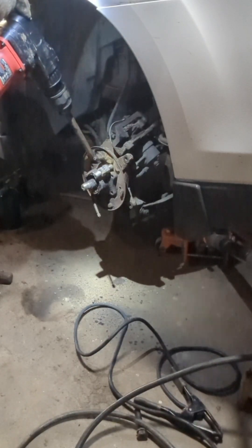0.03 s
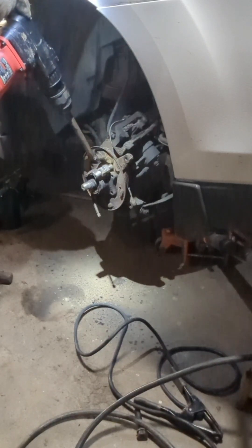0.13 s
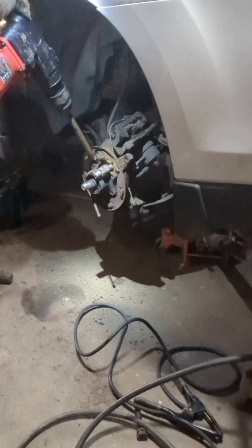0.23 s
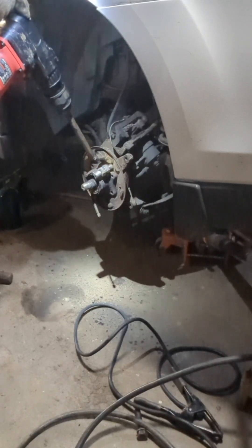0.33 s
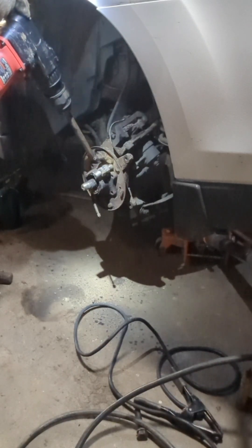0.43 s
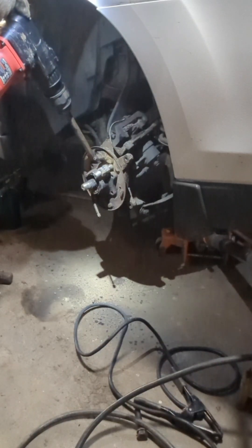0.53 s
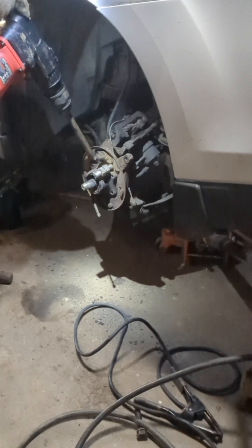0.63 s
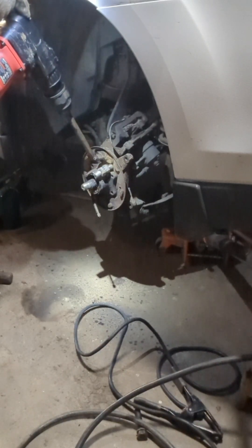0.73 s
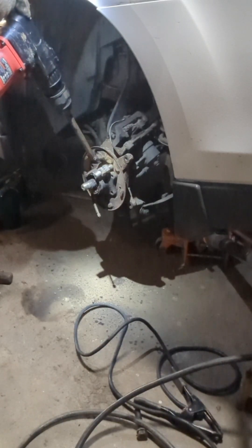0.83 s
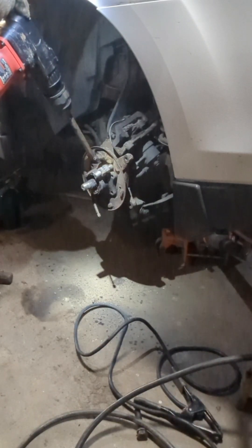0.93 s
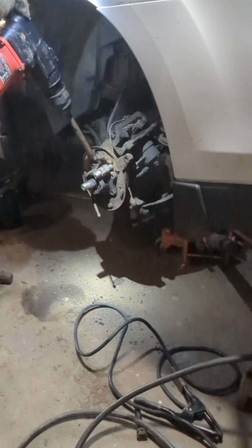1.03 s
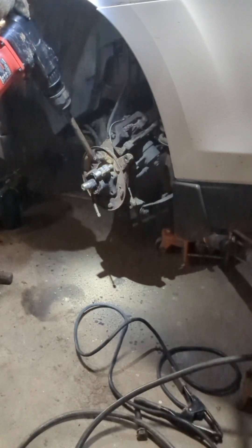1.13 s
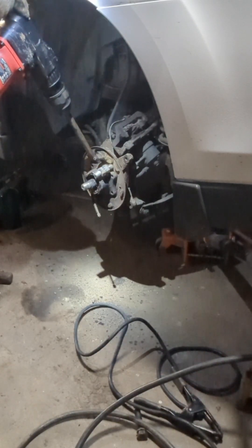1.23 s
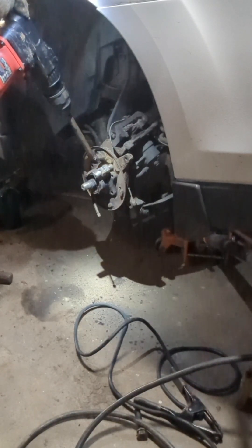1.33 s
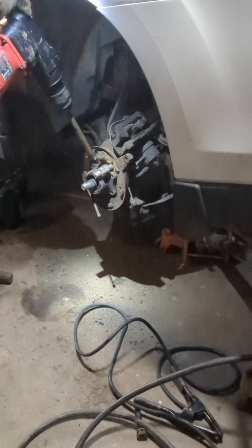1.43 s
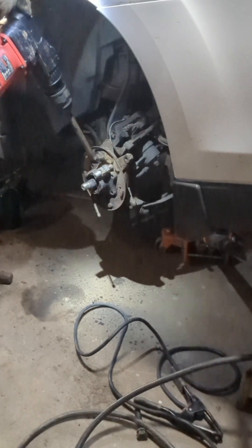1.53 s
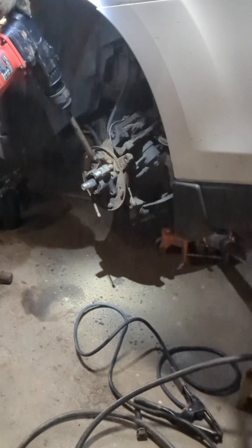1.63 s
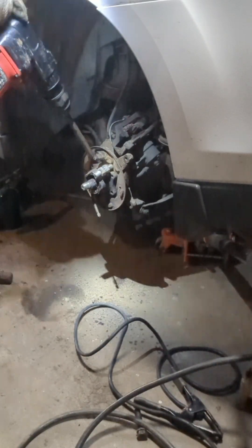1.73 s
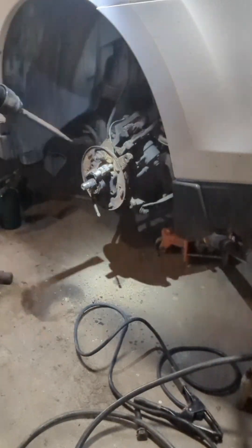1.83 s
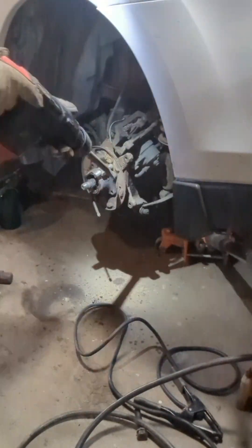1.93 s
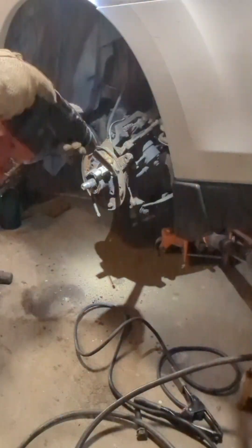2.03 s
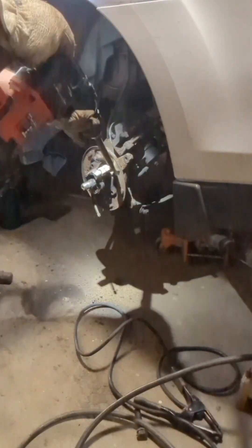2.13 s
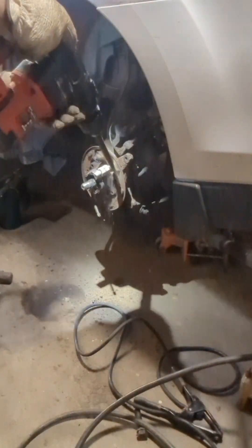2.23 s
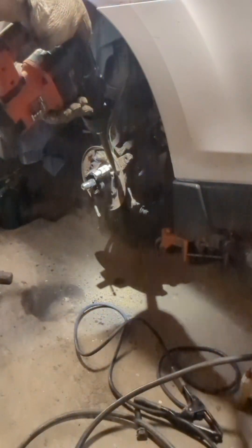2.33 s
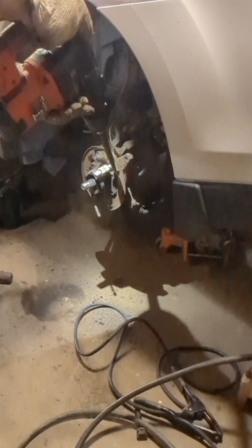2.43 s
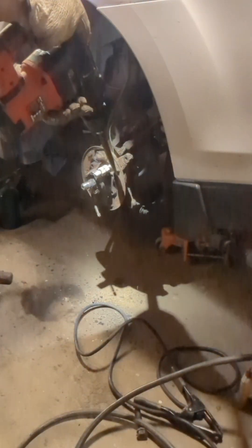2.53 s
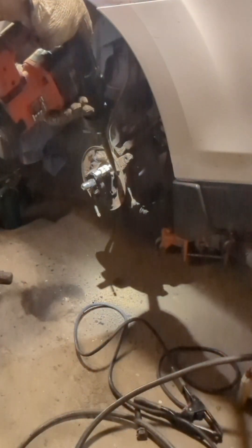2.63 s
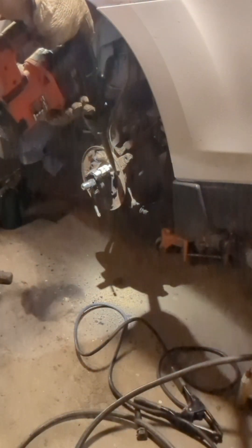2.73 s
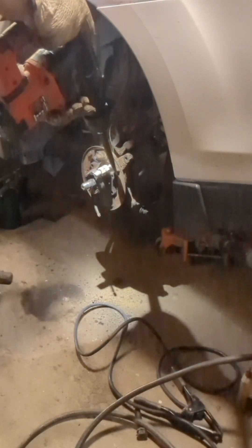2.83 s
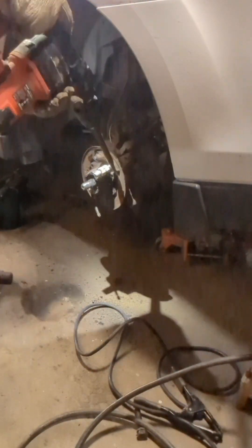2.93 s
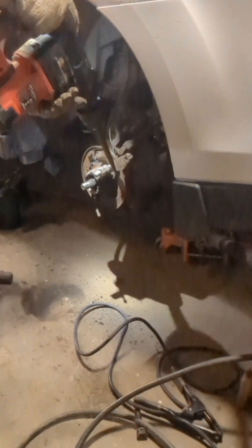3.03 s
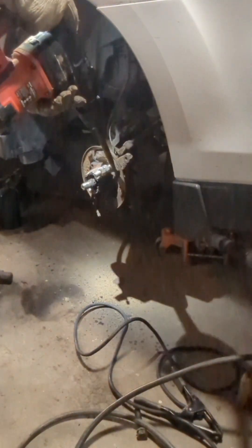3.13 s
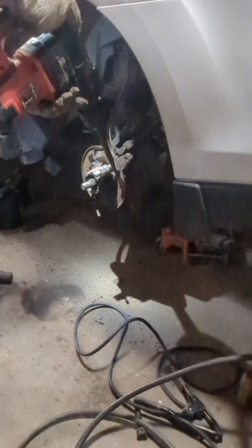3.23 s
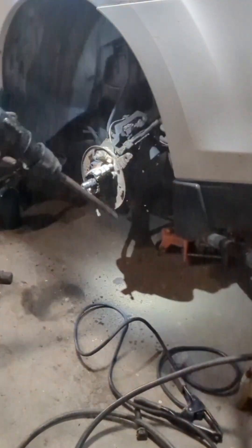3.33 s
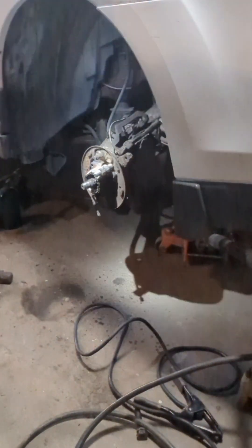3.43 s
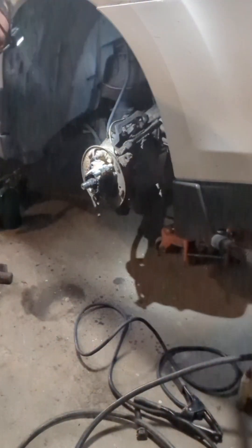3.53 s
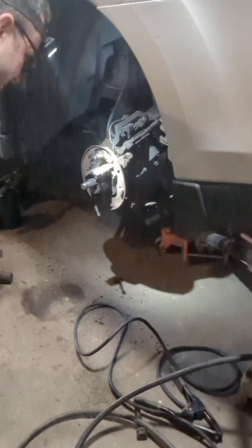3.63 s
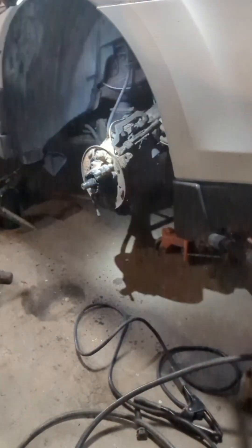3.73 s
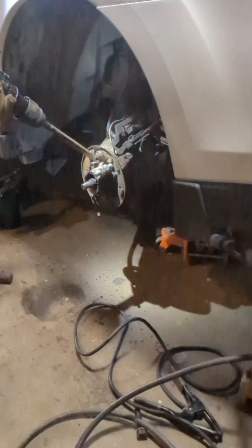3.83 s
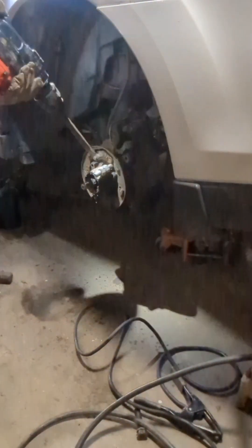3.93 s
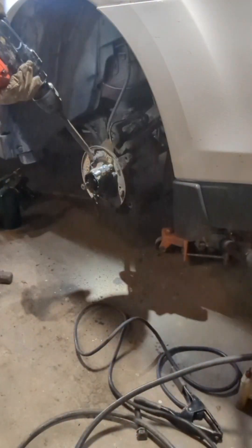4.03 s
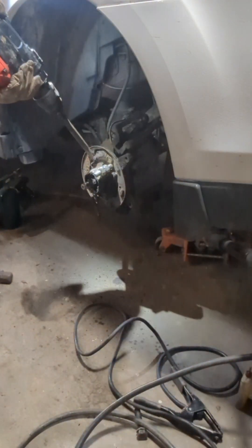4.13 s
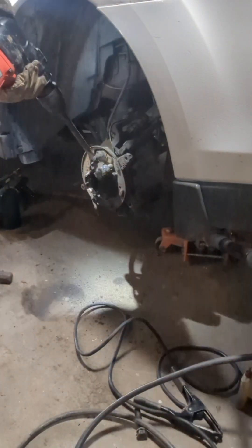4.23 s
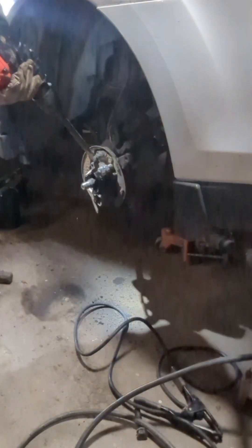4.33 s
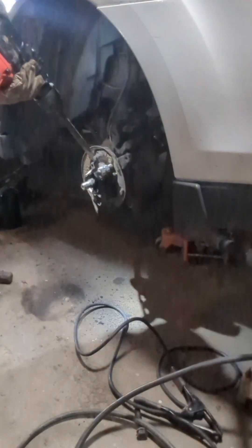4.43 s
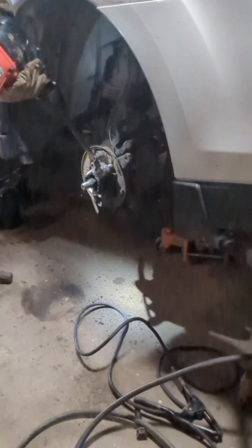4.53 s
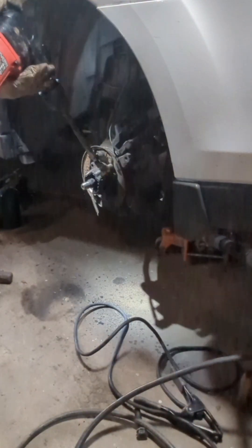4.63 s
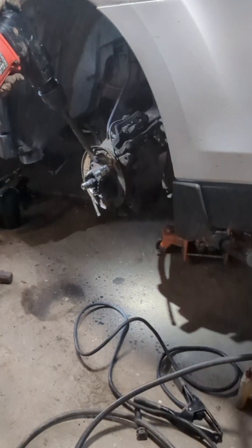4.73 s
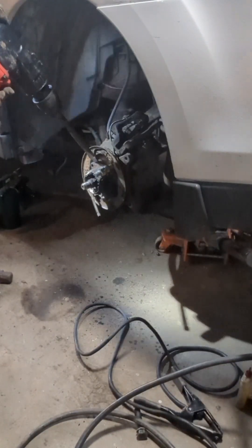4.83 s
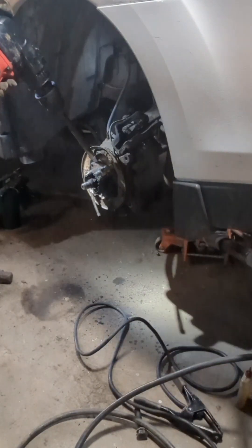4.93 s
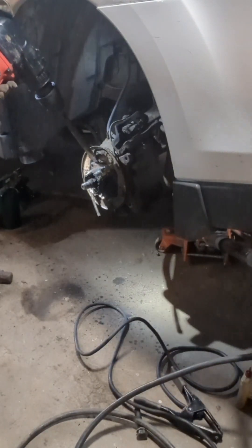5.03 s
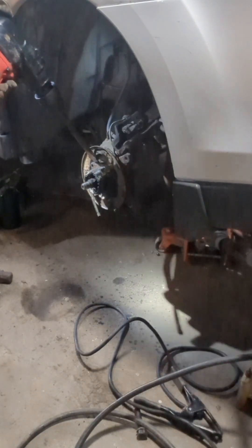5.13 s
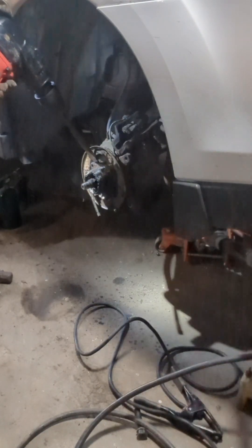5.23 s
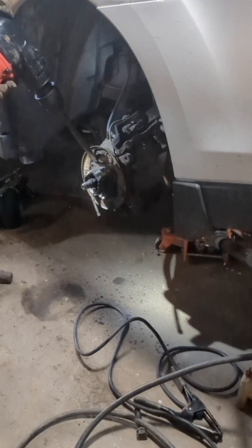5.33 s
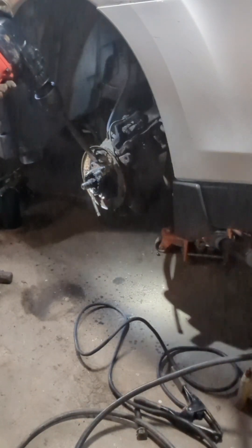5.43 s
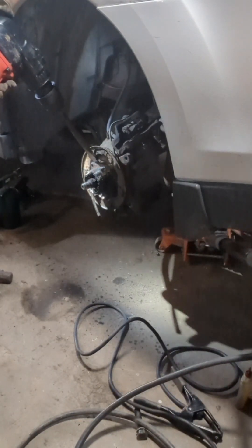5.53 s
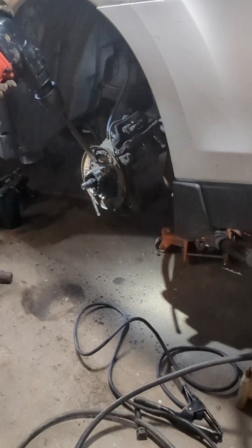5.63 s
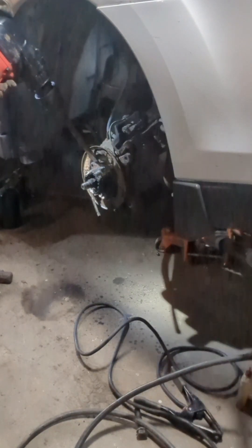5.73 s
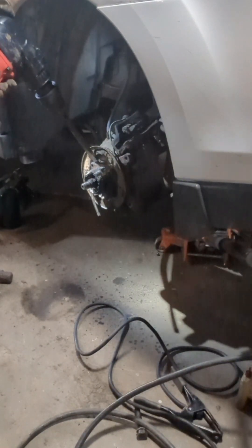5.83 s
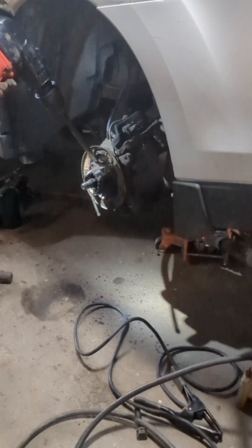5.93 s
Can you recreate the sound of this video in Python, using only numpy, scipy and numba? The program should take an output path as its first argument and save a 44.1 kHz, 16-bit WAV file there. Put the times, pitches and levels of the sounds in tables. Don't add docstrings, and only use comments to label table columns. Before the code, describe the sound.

Fast, harsh metallic hammering for over a second, then an unloaded electric tool whirring, stopping, and restarting twice amid glove rustle and steel taps.

```python
import sys
import numpy as np
from scipy import signal
from scipy.fft import rfft, irfft, next_fast_len
from scipy.io import wavfile
from scipy.ndimage import uniform_filter1d
from numba import njit

SR = 44100
rng = np.random.default_rng(int(sys.argv[2]) if len(sys.argv) > 2 else 0)


def ratio(d):
    e = np.asarray(d, float) / 20
    return 10 ** e


def output_pcm(signal):
    pcm = np.clip(np.atleast_2d(signal).T, -1, 1) * 32767
    wavfile.write(sys.argv[1], SR, np.round(pcm).astype(np.int16))


N = 263698
TIME = np.arange(N) / SR
ATTACK_S, RELEASE_S = 0.0085, 0.012


def noise():
    return rng.standard_normal((2, N))


def level(x, db):
    return x * ratio(db) / np.sqrt(np.mean(x ** 2))


def colour(x, points, modes=(), mode_db=0.):
    size = next_fast_len(N)
    f = np.arange(size // 2 + 1) * SR / size + 1
    hz, db = np.transpose(points)
    gain = ratio(np.interp(np.log(f), np.log(hz), db))
    lift = sum(ratio(d + mode_db) / (1 + 2j * (f - h) / w) for h, w, d in modes)
    return irfft(rfft(x, size) * gain * (1 + lift), size)[..., :N]


def tilted(x, treble_lift_db, pivot_hz=4000):
    low = signal.sosfilt(signal.butter(1, pivot_hz, fs=SR, output="sos"), x)
    return low * ratio(-treble_lift_db) + (x - low) * ratio(treble_lift_db)


def walk(rate, count, s=TIME):
    knots = rng.standard_normal((count, int(N / SR * rate) + 2))
    return 1.41 * np.array([np.interp(s * rate, np.arange(len(k)), k) for k in knots])


def train(times, sizes):
    out = np.zeros(N)
    np.add.at(out, np.round(np.asarray(times) * SR).astype(int), sizes)
    return out


def span(start, end, attack_s=ATTACK_S, release_s=RELEASE_S):
    early, late = np.maximum(start - TIME, 0), np.maximum(TIME - end, 0)
    return -20 * (early / attack_s + late / release_s)


# pitch_hz, level_db
HUB_NOTES = [(559.9, -54), (764.4, -57), (915.2, -55), (1017, -47.5), (1066, -45), (1120, -52), (1222, -48),
             (1421, -56), (1523, -57), (1728, -57), (1933, -54), (2083, -52), (2589, -55)]


def hub_rings(blows):
    out, t60_s = 0, 0.22
    for hz, db in HUB_NOTES:
        pole = np.exp(2j * np.pi * hz / SR - np.log(1000) / (t60_s * SR))
        ring = signal.lfilter([1], [1, -pole], blows[:int(1.5 * SR)])
        random_phase = np.exp(2j * np.pi * rng.random((2, 1)))
        mid, side = level((ring * random_phase).real, db - 0.5)
        out = out + np.array([mid + side, mid - side])
    return np.pad(out, ((0, 0), (0, N - out.shape[1])))


BLOW_HZ, FIRST_BLOW_S, LAST_BLOW_S = 50.84, 0.016, 1.385
# time_s, level_db
HAMMER_LEVEL = [(0.0, -27.5), (1.326, -27.5), (1.38, -26.5), (1.392, -30.5)]
# freq_hz, level_db (per Hz)
STEEL_COLOUR = [(30, -4), (150, -23), (300, -15), (560, -10.5), (870, -6.5), (1100, -5.5), (1700, -5.5),
                (2650, -4), (2850, -8.5), (5200, -7), (8300, -7), (9900, -4), (10700, -10.5), (16000, -13)]
# freq_hz, width_hz, level_db
STEEL_MODES = [(5450, 33, -36), (7368, 186, -6), (9080, 32.76, -6), (8600, 15.8, 5), (9100, 69, -3),
               (8500, 31, -4), (9300, 238, -2.5), (9948, 280, 1.5), (10500, 22, 8), (10300, 73, -61),
               (11200, 30, -12), (15500, 57, -9)]


def hammer():
    times = np.arange(FIRST_BLOW_S - 1 / BLOW_HZ, LAST_BLOW_S, 1 / BLOW_HZ)
    jitter, force, bounce = rng.standard_normal((len(times), 3)).T
    blows = train(np.abs(times + .00006 * jitter), ratio(0.53 * force))
    blows = blows + train(np.abs(times + .0095 + .0008 * bounce), ratio(-4.5))
    t = TIME[:SR // 8]
    snap = np.exp(-t / 0.00032) * ratio(4.0)
    body = np.exp(-t / 0.0061) * ratio(1.0)
    tail = np.exp(-t / 0.086) * ratio(-7.0)
    shape = (snap + body + tail) * (1 - np.exp(-t / 0.00031))
    ring = signal.fftconvolve(blows[None], rng.standard_normal((2, len(t))) * shape)[:, :N]
    rattle_power = signal.fftconvolve(blows ** 2, shape ** 2)[:N]
    rattle = noise() * np.sqrt(rattle_power + 1e-12)
    steel = colour(level(ring, 0) + level(rattle, -1.6), STEEL_COLOUR, STEEL_MODES, mode_db=4)
    steel = steel / np.sqrt(np.mean(steel[:, TIME < LAST_BLOW_S] ** 2))
    steel = steel * ratio(2.5) + hub_rings(blows) * ratio(28)
    s, db = np.transpose(HAMMER_LEVEL)
    return steel * ratio(np.interp(TIME, s, db, -120, -120)), times


# time_s, peak_db
MIC_JOLTS = [(0.057, -22), (0.076, -20.5), (0.0957, -16.5), (0.1154, -15), (0.136, -30), (0.215, -37),
             (0.233, -23), (0.252, -35), (0.292, -18), (0.4497, -36), (0.5086, -30.0), (0.528, -40),
             (0.6066, -28.5), (0.626, -31), (0.6464, -33), (0.685, -25.5), (0.7441, -28), (0.9015, -40),
             (0.9206, -15.5), (0.9802, -33.5), (1.04, -36), (1.316, -42), (1.3352, -27.5)]


def jolts(times):
    s, db = np.transpose(MIC_JOLTS)
    small = ratio(-42 + 1.7 * rng.standard_normal(len(times)))
    lead_s = TIME[100]
    t = TIME[:SR // 16] - lead_s
    after = np.maximum(t - .0008, 0)
    swing = np.sin(2 * np.pi * 112 * after / (1 + after / 0.022)) * np.exp(-after / 0.0098)
    shove = swing - ratio(5.5) * np.exp(-(t / 0.00062) ** 2)
    pushes = train(s - lead_s, ratio(db)) + train(np.abs(times - .001), small)
    moved = signal.fftconvolve(pushes, shove)[:N]
    felt = signal.sosfilt(signal.butter(2, 30, "high", fs=SR, output="sos"), moved)
    return felt * ratio([[-20], [0]])


def tool_running():
    lag_s = 0.067
    running = sum((TIME > r[0]) & (TIME < r[3] + lag_s) for r in RUNS) + (TIME < LAST_BLOW_S + .01)
    return uniform_filter1d(np.minimum(running, 1.), int(.03 * SR))


# freq_hz, level_db (per Hz)
ROOM_COLOUR = [(30, -39), (300, -33.5), (450, -8.5), (900, -15.5), (1500, -12), (2200, -27), (3500, -14.5),
               (5000, -17.5), (8000, -21), (16000, -14)]
# time_s, half_length_s, gain_db
GATE_MOVES = [
    (1.957, 0.032, -14),
    (2.01, 0.0074, -6),
    (2.06, .04, 2),
    (2.098, .012, -5),
    (3.407, 0.096, -15),
    (3.517, .022, -10),
    (3.804, 0.11, 3),
    (3.95, 0.011, 15.5),
]


def room():
    running = tool_running()
    patchy = ratio(1.5 * walk(8, count=1))
    air = level(colour(noise() * patchy, ROOM_COLOUR), -59.5)
    gate_db = sum(db * np.maximum(1 - np.abs(TIME - s) / half, 0) for s, half, db in GATE_MOVES)
    air = tilted(air, -4 * (1 - running) + 0.44 * gate_db)
    return air * ratio(1.5 * (1 - running) - 0.5 * running + gate_db)


# start_s, nearly_full_speed_s, trigger_release_s, brake_stop_s
RUNS = [
    (1.388, 1.21, 1.737, 1.814),
    (2.113, 2.181, 3.286, 3.322),
    (3.953, 4.019, 6.5, 6.6),
]
# time_s, speed_hz
GOVERNED_SPEED = [(1.42, 440.6), (1.72, 437.5), (2.28, 437.8), (2.736, 433), (3.27, 434.9), (4.1, 434.4),
                  (4.25, 433.8), (4.442, 431.5), (4.552, 435.4), (4.75, 432.6), (4.87, 430.8),
                  (5.058, 430.2), (5.97, 432)]


def rotor():
    run = np.searchsorted([r[3] + .1 for r in RUNS], TIME)
    _, full, release, _ = np.array(RUNS)[run].T
    climb_hz = 2600 * np.maximum(full - TIME, 0)
    ease_hz = 27.06 * np.exp(-np.maximum(TIME - full, 0) / 0.024)
    braking = np.maximum(TIME - release, 0)
    governed = np.interp(TIME, *np.transpose(GOVERNED_SPEED))
    hz = governed - (climb_hz + ease_hz) - 2200 * braking
    return np.maximum(hz, 100), run, braking


WHINE_DB = [-13.5, -20.0, -11.5, -13.5, -6.0, -15.0, -11.0, -10.5, -16.0, -9.0, -3.5, -5.5, -9.5, -5.0,
            -12.0, -4.5, -9.0, -13.0, -10.0, -8.0, -6.5, -4.0, -7.0, -11.0, -10.5, -1.0, -14.0, 0.0, -4.5,
            -9.0, -6.5, -5.0, -1.5, -10.0, -7.5, -7.0]
# start_s, tilt_db_per_octave, casing_hz, width_hz, casing_db
HOLDS = [
    (0, 1.1, 9600, 900, 3),
    (2.0, 0.37, 6630, 1500, -4),
    (3.6, 1.1, 6900, 1500, 2),
    (4.77, 1.2, 11200, 500, 0.5),
]
# delay_ms, share
ECHOES = [
    [(0.105, 0.35), (0.22, 0.35), (0.72, -0.35), (0.825, -0.25), (0.155, -0.15)],
    [(0.685, 0.35), (0.3, 0.25), (0.535, 0.25), (1.005, 0.25), (0.02, 0.75)],
    [(0.795, -0.25), (0.055, 0.25), (0.62, -0.15), (0.985, -0.15), (0.5, -0.15)],
    [(1.11, 0.25), (0.15, 0.25), (0.555, -0.25), (0.315, -0.25), (0.45, 0.15)],
]


def held(hz):
    delay_ms, share = np.transpose(ECHOES)[..., None]
    echo = share * np.exp(2j * np.pi * hz * delay_ms / 1000)
    comb_db = 20 * np.log10(np.abs(1 + echo)).sum(axis=0)
    _, tilt_db, casing_hz, width, casing_db = np.transpose(HOLDS)[..., None]
    casing = casing_db / (1 + (2 * (hz - casing_hz) / width) ** 2)
    return (WHINE_DB + comb_db + tilt_db * np.log2(hz / 4350) + casing).T


@njit
def harmonics(turns, weight, hop):
    out = np.zeros((2, len(turns)))
    for i in range(len(turns)):
        step, part = i // hop, (i % hop) / hop
        z = np.exp(2j * np.pi * turns[i])
        zk = z
        for k in range(weight.shape[2]):
            for c in range(2):
                now = weight[c, step, k] * (1 - part) + weight[c, step + 1, k] * part
                out[c, i] += (zk * now).real
            zk *= z
    return out


# freq_hz, level_db
MOTOR_WIDTH = [(60, 3), (110, -8), (200, 2), (380, -10), (700, 1.5), (1290, -8), (2380, -9.5), (4400, -7.5),
               (8120, 1.5), (15000, -1.5)]
TOOL_PAN_DB = [-2.1, -1.1, -1.1, -2.7]


def whine(turns):
    hop, count = 128, len(WHINE_DB)
    s = np.append(TIME[::hop], N / SR)
    hold = uniform_filter1d(np.searchsorted(np.array(HOLDS)[:, 0], s, "right") - 1., size=20)
    hz = 435 * np.arange(1, count + 1)
    db = np.array([np.interp(hold, np.arange(len(row)), row) for row in held(hz)])
    phase, lag, apart_db = rng.standard_normal((3, count, 1))
    drift = walk(6, count=3 * count, s=s).reshape(3, count, -1)
    mid = ratio(db + 1.6 * drift[0]) * np.exp(2.2j * phase + .35j * drift[1])
    shake = walk(70, count=2 * count, s=s).reshape(2, count, -1) * np.arange(count)[:, None] / count
    mid = mid * ratio(1.7 * shake[0]) * np.exp(.45j * shake[1])
    mid = mid / np.sqrt(np.sum(ratio(db) ** 2, axis=0) / 2)
    width_db = np.interp(hz[:, None], *np.transpose(MOTOR_WIDTH))
    side = mid * ratio(width_db + 2.0 * apart_db + 1.0 * drift[2]) * np.exp(3j * lag)
    pan = ratio(np.interp(hold, np.arange(len(HOLDS)), TOOL_PAN_DB) / 2)
    left, right = (mid + side) * pan, (mid - side) / pan
    return harmonics(turns, np.array([left.T, right.T]), hop)


# under_1500_hz_db, from_2_to_5_khz_db
VENTS = [(1, -4.5), (-0.5, -2), (1, -2), (-5.5, -3)]


def shaded(x):
    low = signal.sosfilt(signal.butter(2, 1500, fs=SR, output="sos"), x)
    middle = signal.sosfilt(signal.butter(1, [2300, 4600], "band", fs=SR, output="sos"), x)
    hold = np.searchsorted(np.array(HOLDS)[1:, 0], TIME)
    low_db, middle_db = uniform_filter1d(np.array(VENTS, float)[hold].T, size=4000)
    return x + low * (ratio(low_db) - 1) + middle * (ratio(middle_db) - 1)


# freq_hz, level_db (per Hz)
BRUSH_COLOUR = [(30, -28), (250, -30), (400, -15), (700, -15.5), (1200, -16.5), (2200, -11.5),
                (2800, -12.5), (3300, -6), (4000, -10.5), (4600, -5.5), (5500, -3.5), (9000, -4.5),
                (12000, -4), (16000, -2)]


def brushes(turns):
    gate = .5 + np.exp(-(turns % 1) / 0.07)
    mid, side = colour(gate * noise(), BRUSH_COLOUR)
    side = colour(side, MOTOR_WIDTH)
    stereo = level(np.array([mid + side, mid - side]), 0)
    return shaded(stereo) * ratio(1.0 * walk(8.5, count=1))


# freq_hz, width_hz, level_db
GEAR_MODES = [(3298, 45, -5), (6480, 83, -4.5), (9100, 150, -19), (9260, 150, -4), (13500, 39, -16)]
# start_s, end_s, first_db, last_db
CHATTER = [
    (1.73, 1.812, -43.5, -48),
    (2.113, 2.196, -37, -44),
    (3.28, 3.322, -43.5, -52.5),
    (3.953, 4.018, -34.5, -37),
]


def gear_chatter():
    teeth = ratio(0.64 * rng.exponential(size=N)) * (rng.random(N) < 1500 / SR)
    smear = signal.lfilter([1], [1, -np.exp(-1 / (0.00097 * SR))], teeth)
    chatter = level(colour(noise() * (smear + 1), BRUSH_COLOUR, GEAR_MODES, mode_db=14.5), 0)
    gain = 0
    for start, end, first_db, last_db in CHATTER:
        slide_db = np.interp(TIME, [start, end], [first_db, last_db])
        gain = gain + ratio(slide_db + span(start + ATTACK_S, end) + 8.0)
    return chatter * gain


# first_db, settled_db, sink_s, brush_db
RUN_LOUDNESS = [(-36.5, -40.5, 0.23, 0), (-33, -41.5, 0.39, -0.5), (-32.5, -41.5, 0.59, -1.5)]
FIRST_TILT_DB = [-2, -3.5, -5]
SETTLED_TILT_DB = [-1.5, -0.5, 1]


def motor():
    hz, run, braking = rotor()
    turns = np.cumsum(hz * (1 + 0.00022 * walk(30, count=1)[0])) / SR
    brush = brushes(turns)
    start, _, release, stop = np.array(RUNS)[run].T
    first_db, settled_db, sink_s, brush_db = np.array(RUN_LOUDNESS)[run].T
    fresh = np.exp(-np.maximum(TIME - start, 0) / sink_s)
    total_db = settled_db + (first_db - settled_db) * fresh + span(start + ATTACK_S, stop)
    total_db = total_db - 3 * np.minimum(braking / (stop - release), 1)
    tilt_db = np.take(FIRST_TILT_DB, run) * fresh + np.take(SETTLED_TILT_DB, run) * (1 - fresh)
    steady = np.clip((hz - 363) / 67, 0, 1) * np.exp(-braking / 0.016)
    mesh = ratio(-27) * np.sin(2 * np.pi * 17 / 3 * turns)
    steady_brush = ratio(brush_db) * tilted(brush, tilt_db + np.array([[1.5], [-1.5]]))
    brush = steady * steady_brush + (1 - steady) * brush
    running = (steady * (whine(turns) + mesh) + brush) * ratio(total_db - 2.0)
    return running + gear_chatter()


def casing_rumble():
    rumble = level(colour(noise(), [(25, -5.5), (200, -4.5), (300, -1.5), (400, -38)]), -80)
    spinning = sum(ratio(span(start, stop)) for start, _, _, stop in RUNS).clip(0, 1)
    return rumble * ratio(spinning * 23.6 - 26)


def no_thump(x):
    return signal.sosfilt(signal.butter(6, 330, "high", fs=SR, output="sos"), x)


# time_s, peak_db
KNOCKS = [(1.392, -30.5), (1.403, -34.5), (1.417, -40.5), (1.442, -39), (1.463, -42), (2.548, -54),
          (3.09, -52), (3.304, -46.5), (3.32, -52), (3.923, -36), (3.931, -38), (5.25, -54), (5.548, -51),
          (5.565, -55)]


def knocks():
    out, t = np.zeros((2, N + SR)), TIME[:SR // 8]
    swing = np.sin(2 * np.pi * 900 * t) * np.exp(-t / 0.00031)
    for s, db in KNOCKS:
        at = int(s * SR)
        out[:, at:at + len(t)] -= ratio(db + 12) * swing
    return no_thump(out[:, :N])


# freq_hz, level_db (per Hz)
CLOTH_COLOUR = [(200, -58), (500, -22), (1500, -12), (2300, -15), (3000, -7.5), (4500, -5.5), (6500, -2.5),
                (9000, -10), (16000, -6)]
# start_s, peak_s, end_s, peak_db, tilt_db (treble raised, bass lowered by this)
RUSTLES = [(1.81, 1.823, 1.835, -55, 6), (1.816, 1.863, 1.92, -55.5, 10), (1.853, 1.905, 1.935, -52, 13),
           (1.974, 1.988, 2.0, -55, 7), (2.02, 2.037, 2.05, -45, -10), (2.043, 2.068, 2.1, -53, 2),
           (3.33, 3.353, 3.434, -46, 5), (3.322, 3.41, 3.5, -49.5, 7), (3.4, 3.48, 3.51, -53, 8.5),
           (3.532, 3.538, 3.6, -48.5, 7.5), (3.532, 3.558, 3.62, -54.5, 7), (3.74, 3.8, 3.86, -72, -1),
           (3.563, 3.63, 3.6572, -63, 9), (3.72, 3.735, 3.74, -51, 4), (3.847, 3.86, 3.9, -53, -3),
           (3.852, 3.898, 3.93, -47, -11.5), (3.916, 3.931, 3.938, -39.5, -13)]


def gloves():
    crackle = noise() * ratio(1.24 * walk(65, count=1) + 3.0 * walk(330, count=2))
    cloth = level(colour(crackle, CLOTH_COLOUR), 0)
    out, fade_db = 0, 21.5
    for start, peak, end, db, tilt_db in RUSTLES:
        swell_db = fade_db / 20 * span(peak, peak, peak - start, end - peak)
        out = out + tilted(cloth, tilt_db) * ratio(db - 2.5 + swell_db)
    return out


# pitch_hz, level_db
LAMP_TONE = [(1405, -69.5)]


def lamp():
    tone = sum(ratio(db + 7.5) * np.sin(2 * np.pi * hz * TIME) for hz, db in LAMP_TONE)
    tone = tone * ratio(0.4 * walk(12, count=1))
    return tone * ratio(-15 * tool_running()) * ratio([[-1.5], [1.5]])


# time_s, peak_db, ring_hz, ring_db, crack_s
CLINKS = [(1.882, -41, 6440, -7, 0.0056), (1.991, -44.5, 6140, 1, 0.0046), (2.027, -38, 4210, -5, 0.0059),
          (2.0632, -43, 6290, -15, 0.008), (2.158, -15, 6140, -9, 0.0021),
          (3.358, -46.5, 2970, 4.5, 0.0012), (3.722, -35.5, 7400, -12, 0.0062),
          (3.833, -40, 1500, -8, 0.0058), (3.8636, -34, 4500, -12, 0.0074),
          (3.8945, -42.5, 2560, 4, 0.0011), (3.9206, -15.5, 1970, -18, 0.0021),
          (3.929, -33.5, 2827, 4, 0.001), (3.966, -19.5, 9080, -1.5, 0.00067),
          (3.9774, -21, 9260, 2.5, 0.0015), (3.989, -21.5, 9150, -2, 0.002),
          (4.001, -14.5, 9100, -5.5, 0.0014)]


def clinks():
    out, t, t60_s = np.zeros((2, N + SR)), TIME[:SR // 8], 0.031
    for s, db, hz, ring_db, crack_s in CLINKS:
        chance = rng.standard_normal((2, len(t)))
        crack = signal.lfilter([1, -.6], [1], chance) * ratio(-4) * np.exp(-t / crack_s)
        ring = np.sin(2 * np.pi * hz * t + .5 * chance[:, :1]) * ratio(ring_db - 60 * t / t60_s)
        onset = 1 - np.exp(-t / (0.51 * crack_s))
        at = int(s * SR)
        out[:, at:at + len(t)] += ratio(db) * (ring + crack) * onset
    return no_thump(out[:, :N])


def scene():
    steel, times = hammer()
    tool = steel + jolts(times) + motor() + casing_rumble() + knocks()
    return tool + room() + gloves() + lamp() + clinks()


def roll_off(x):
    return signal.sosfilt(signal.butter(12, 17060, fs=SR, output="sos"), x)


def record(dry):
    top = signal.ellip(12, .3, 75, 15750, fs=SR, output="sos")
    mix = signal.sosfilt(top, dry)
    return roll_off(mix)


dry = scene()
out = record(dry)
output_pcm(out)
```